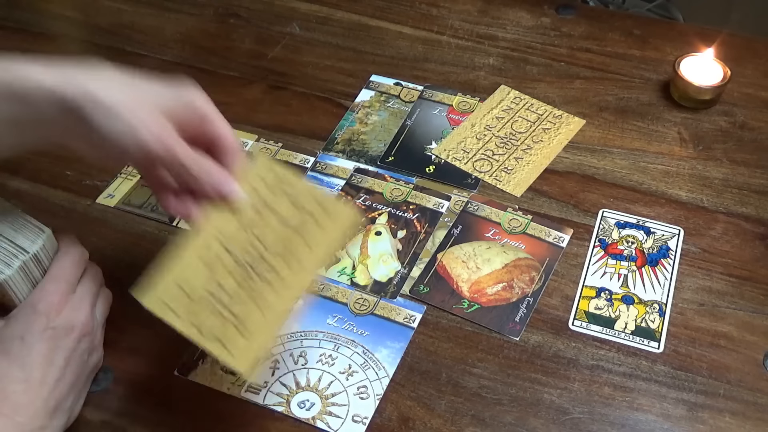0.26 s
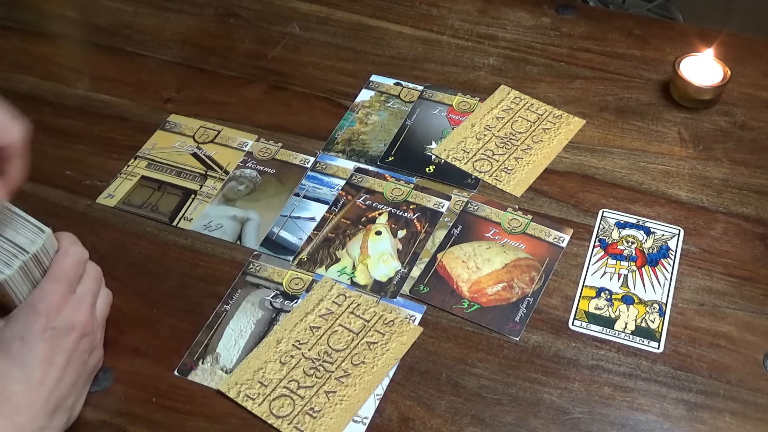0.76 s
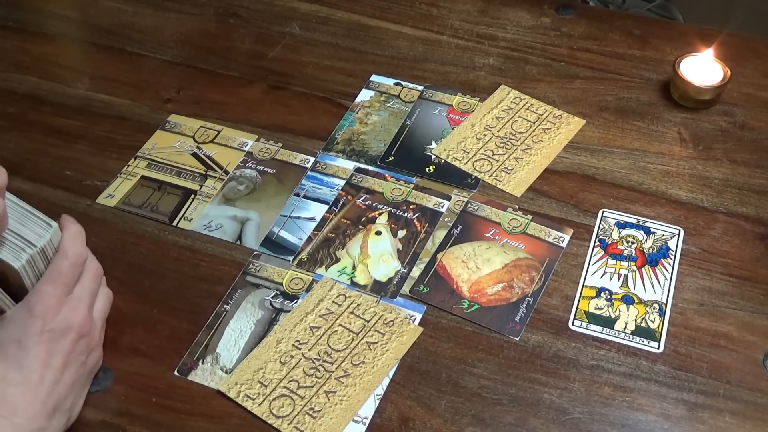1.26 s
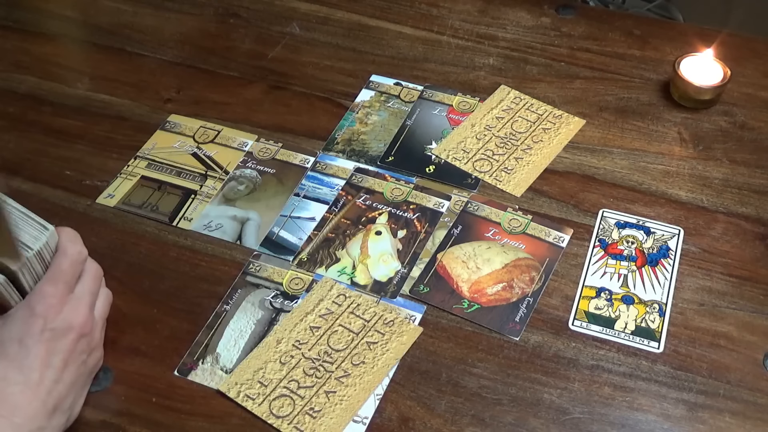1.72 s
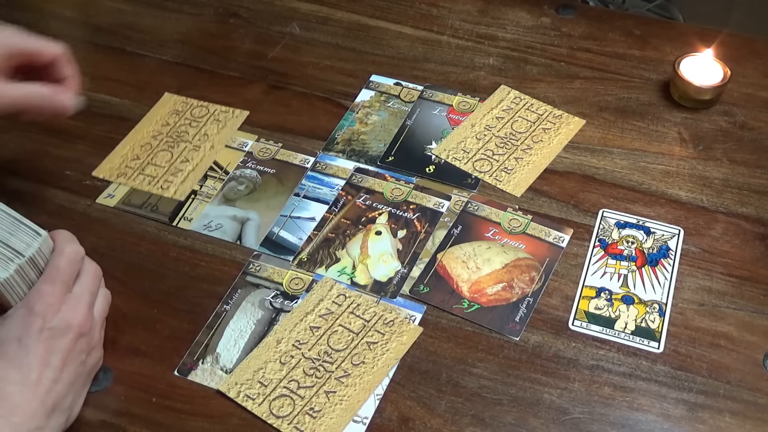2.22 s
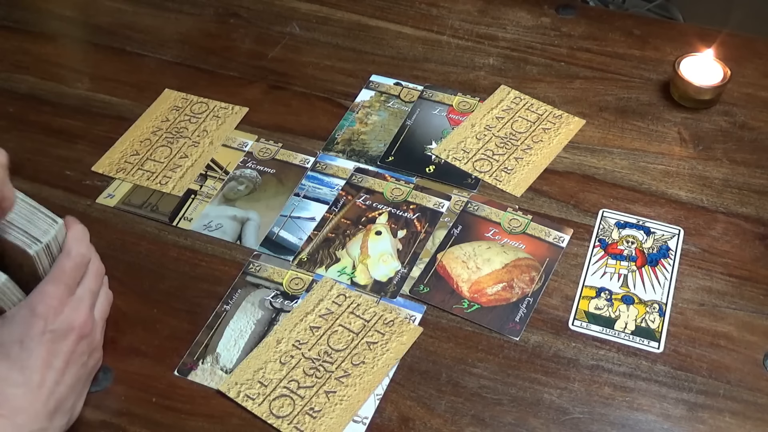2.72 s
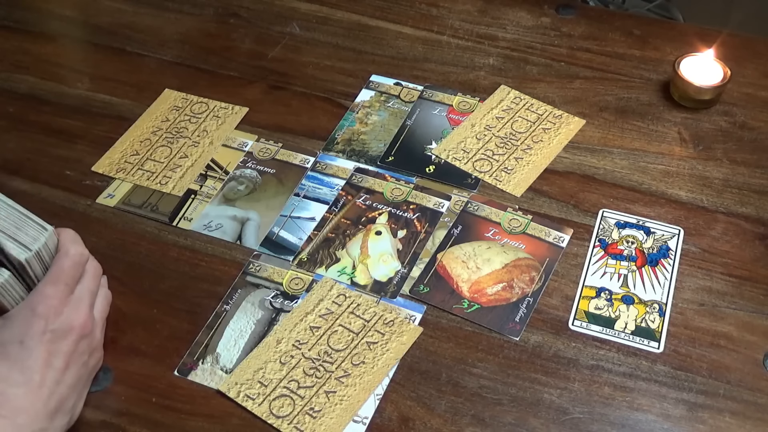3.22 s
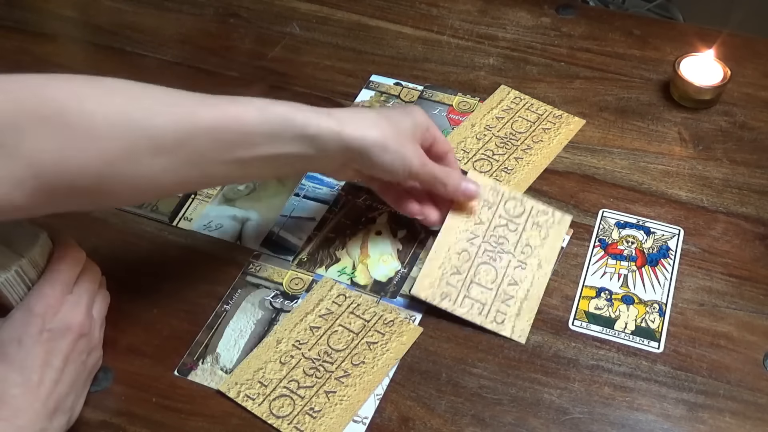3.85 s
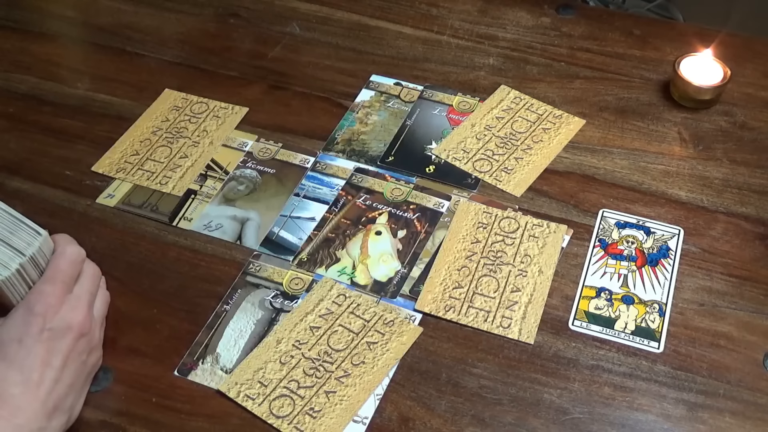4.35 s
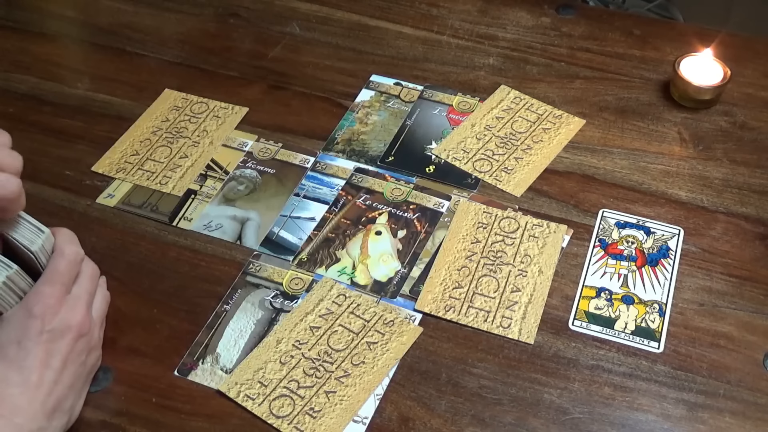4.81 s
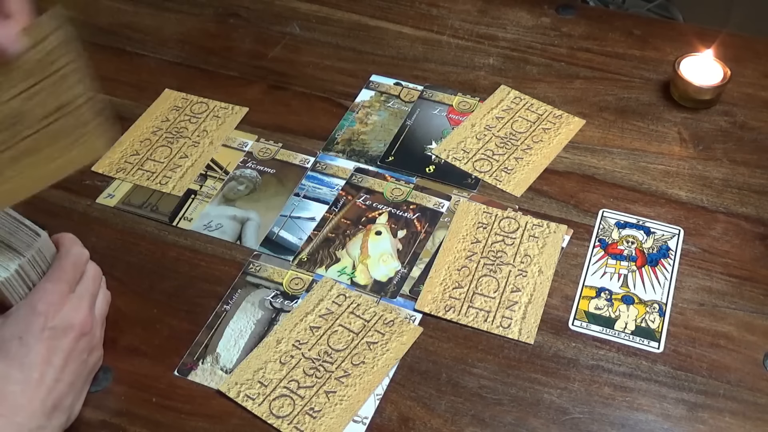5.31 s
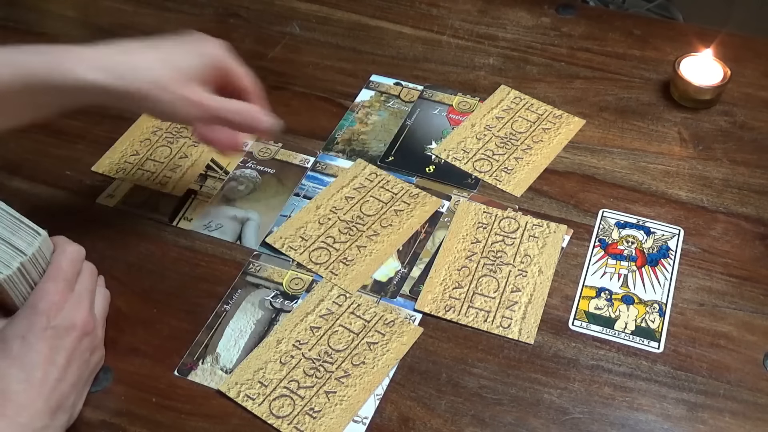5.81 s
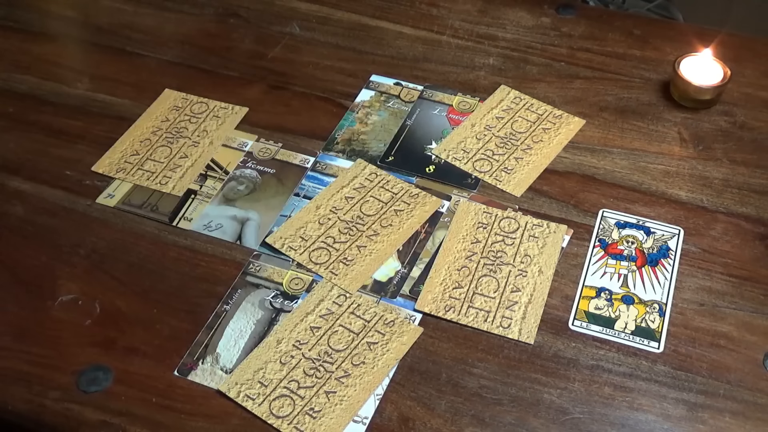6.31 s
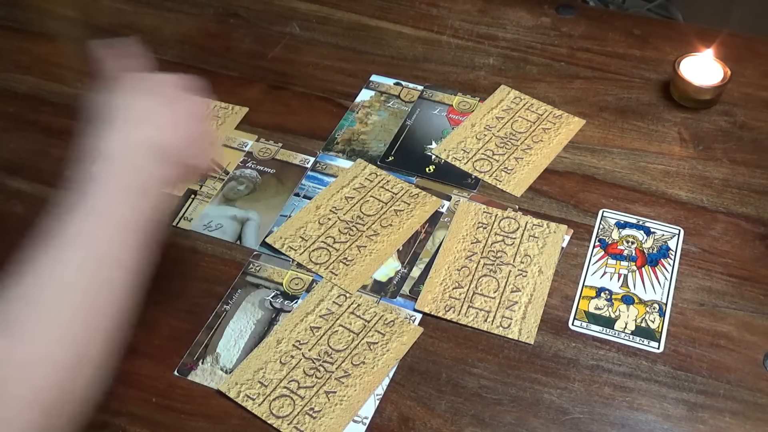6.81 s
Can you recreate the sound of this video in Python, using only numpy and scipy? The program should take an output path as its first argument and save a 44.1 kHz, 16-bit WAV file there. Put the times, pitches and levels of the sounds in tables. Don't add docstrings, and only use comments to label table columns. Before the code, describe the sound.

Close stereo pickup in a small quiet room with faint mains hum, rumble and hiss. Stiff cards are drawn from a held deck with dry rasps, snap at the edges and land on a wooden table with light knocks. Uneven pauses separate them. Near the end, the whole deck is slapped down, a bright crack with a woody thump far louder than the rest.

```python
import sys
import numpy as np
from scipy import signal
from scipy.fft import rfft, irfft, next_fast_len
from scipy.io import wavfile

SR = 44100
rng = np.random.default_rng(int(sys.argv[2]) if len(sys.argv) > 2 else 0)


def invert_db(x):
    u = np.asarray(x, float) / 20
    return 10 ** u


def file_out(sig):
    cols = np.atleast_2d(sig).T
    lim = np.clip(cols, -1, 1)
    pcm = np.round(lim * 32767).astype(np.int16)
    wavfile.write(sys.argv[1], SR, pcm)


N = 311390
SIDES = np.array([[1], [-1]])


def rms_one(x):
    return x / np.sqrt(np.mean(x ** 2) + 1e-20)


def at_hz(points, hz):
    point_hz, value = np.transpose(points)
    return np.interp(np.log(hz), np.log(point_hz), value)


def drift(rate_hz):
    r = np.exp(-40 * np.pi * rate_hz / SR)
    slow = signal.lfilter([1], [1, -2 * r, r * r], rng.standard_normal(N // 20 + 2002))[2000:]
    return np.interp(np.arange(N) / 20, np.arange(len(slow)), rms_one(slow))


def resonate(x, hz, width_hz):
    r = np.exp(-np.pi * width_hz / SR)
    zeros = np.array([1, 0, -1]) * (1 - r * r) / 2
    poles = [1, -2 * r * np.cos(2 * np.pi * hz / SR), r * r]
    return signal.lfilter(zeros, poles, x)


def butter_filter(x, order, hz, kind):
    return signal.sosfilt(signal.butter(order, hz, kind, fs=SR, output="sos"), x)


def add(out, s, piece):
    i = round(s * SR)
    out[..., i:i + piece.shape[-1]] += piece[..., :N - i]


def room_tone():
    # centre_hz, density_db (per Hz)
    tone_curve = [(35, -23), (62, 10), (110, 10), (250, 5.5), (500, -2), (1000, -8), (1300, -6.5),
                  (1700, -12.5), (2500, -12.5), (3700, -12), (5000, -13.5), (7000, -15.5), (11000, -15),
                  (16000, -17.5)]
    # centre_hz, likeness (-1 to 1)
    likeness = [(60, -0.69), (110, -0.57), (200, -0.15), (380, -0.1), (700, 0.0), (1290, 0.27),
                (2380, 0.25), (4400, 0.15), (6500, 0.15), (7200, 1), (15000, 0.95)]
    # multiple, left_db, right_db
    hum_partials = [(1, -51.5, -61), (2, -73, -69), (3, -57, -67), (5, -65.5, -76.5), (7, -70.5, -71.5),
                    (9, -75, -94)]
    mains_hz, level_db = 49.993, -54
    noise, edges_hz = 0, 32 * 2 ** np.arange(0, 9.2, 1 / 3)
    white = rng.standard_normal((2, 2, N))
    for k, (low, high) in enumerate(zip(edges_hz, edges_hz[1:])):
        mid, side = butter_filter(white[k % 2], 2, [low, high], "band")
        centre_hz = np.sqrt(low * high)
        alike = np.clip(at_hz(likeness, centre_hz), -1, 1)
        wander_db = (0.5 + 12.0 / np.sqrt(low)) * drift(1.1)
        gain = invert_db(at_hz(tone_curve, centre_hz) + wander_db)
        noise = noise + gain * (np.sqrt(1 + alike) * mid + np.sqrt(1 - alike) * side * SIDES)
    phase = 2 * np.pi * mains_hz * np.arange(N) / SR
    hum = sum(np.sqrt(2) * invert_db([[left], [right]]) * np.cos(k * phase - 1) for k, left, right in hum_partials)
    return invert_db(level_db) * noise / np.std(noise.mean(axis=0)) + hum


def room_echo(x):
    t60_s, wall_cut_hz = 0.44, 3800
    size = next_fast_len(N + SR)
    w = 2 * np.pi * np.arange(size // 2 + 1) / size
    dull = 1 / (1 + 1j * w * SR / (2 * np.pi * wall_cut_hz))
    lags = rng.uniform(0.008, 0.035, (2, 8, 1)) * SR
    loops = invert_db(-60 * lags / SR / t60_s) * dull * np.exp(-1j * w * lags)
    echoes = np.sum(loops / (1 - loops), axis=1)
    return irfft(rfft(x, size) * echoes, size)[:, :N]


def table_thuds():
    # start_s, peak_db
    pushes = [(0.129, -34), (.553, -44), (2.209, -48), (2.231, -34.5), (3.182, -58), (3.436, -42.5),
              (4.0398, -42.5), (4.531, -45.5), (4.632, -52), (5.333, -39), (5.368, -36.5), (5.417, -39.5),
              (5.428, -40.5), (5.799, -42.5), (6.04, -35.5), (6.594, -47), (6.715, -37), (6.72, -12.5),
              (6.7526, -26.5)]
    # pitch_hz, level_db, t60_s
    wood_modes = [(86, -11, 0.53), (112.5, -10.5, 0.77), (125, -1.5, 0.46), (160.2, -7.5, 1),
                  (179.3, -9.5, 0.87), (208.5, 6, 0.1), (276, -10.5, 0.29), (322, -12.5, 0.24),
                  (380, -18, 0.16), (444, -15.5, .15), (533, -9, 0.2), (595, 1, 0.26), (613, -17, 0.5),
                  (756, -17, .15)]
    out, t = np.zeros((2, N)), np.arange(18000) / SR
    push = np.sin(np.pi * np.clip(t / 0.0018, 0, 1)) ** 2
    jolt = resonate(push, 250, 154)
    jolt = jolt / np.abs(jolt).max()
    rings = []
    for hz, level_db, t60_s in wood_modes:
        fading = invert_db(level_db - 60 * t / (0.67 * min(t60_s, 0.7)))
        rings.append(fading * np.cos(2 * np.pi * hz * t))
    rings = signal.fftconvolve(rings, push[None, :400] / push.sum(), axes=1)[:, :len(t)]
    for (s, db), chance in zip(pushes, rng.standard_normal((len(pushes), 2, len(wood_modes)))):
        strength = invert_db(1.5 * chance[0] + 1.5 * chance[1] * SIDES)
        add(out, s, invert_db(db) * (jolt + 0.28 * strength @ rings))
    return out


def finger_drags():
    # start_s, length_s, rms_db, centre_hz, width_hz
    drag_list = [(.125, 0.063, -46, 380, 129.6), (.19, .07, -59, 1320, 400), (.438, .095, -57.5, 497, 400),
                 (0.547, .032, -48, 397, 200), (1.049, .17, -62.5, 1200, 300),
                 (2.516, 0.065, -56.5, 450, 400), (2.857, 0.078, -58, 1250, 300),
                 (3.174, 0.028, -49, 365, 150), (4.512, 0.065, -56.5, 374, 200),
                 (5.136, .045, -49, 1940, 150), (5.359, 0.028, -45, 380, 200), (5.79, 0.037, -50, 350, 150),
                 (5.954, .05, -51, 380, 150), (6.025, .04, -39.5, 290, 200), (6.43, 0.11, -56, 560, 250),
                 (6.569, 0.054, -45, 473, 200)]
    out = np.zeros(N)
    for (s, length_s, db, hz, width_hz), noise in zip(drag_list, rng.standard_normal((len(drag_list), 12000))):
        rub = rms_one(resonate(resonate(noise, hz, width_hz), hz, 2 * width_hz))
        swell = np.sqrt(np.hanning(round(length_s * SR)))
        add(out, s, invert_db(db) * rub[:len(swell)] * swell)
    return out


def blows(rows, damping):
    out, t = np.zeros(N), np.arange(2200) / SR
    for (s, db, hz), noise in zip(rows, rng.standard_normal((len(rows), 2200))):
        blow = (t == 0) + 0.13 * noise * np.exp(-t * hz / 4.74)
        blow = signal.lfilter([1], [1, -np.exp(-2 * np.pi * 0.67 * hz / SR)], blow)
        ring = resonate(blow, hz, damping * hz) + 0.59 * resonate(blow, 1.1 * hz, 3.0 * hz)
        add(out, s + 0.00024, invert_db(db - 2.5) * ring / np.abs(ring).max())
    return out


def finger_knocks():
    # start_s, peak_db, centre_hz
    knock_list = [(0.076, -38, 1650), (0.13, -22.5, 850), (0.137, -26, 585), (0.61, -38, 694),
                  (1.704, -37, 401), (1.799, -30, 615), (1.846, -22.5, 810), (1.88, -31, 533),
                  (2.208, -31.5, 1250), (2.214, -32.5, 536), (2.232, -27, 533), (3.319, -28, 1880),
                  (3.336, -36, 595), (3.414, -37, 719), (3.436, -28, 470), (3.443, -24.5, 846),
                  (3.479, -33, 413), (3.622, -38.5, 633), (4.6345, -34, 372), (4.8, -36.5, 437),
                  (5.33, -31.5, 397), (5.344, -31, 820), (5.3675, -27.5, 930), (5.414, -34.5, 1020),
                  (5.798, -36, 760), (5.824, -34, 710), (6.04, -23.5, 816), (6.094, -29.5, 820),
                  (6.448, -34, 650), (6.6135, -31, 380)]
    # start_s, peak_db, centre_hz
    bump_list = [(.1328, -16.5, 1500), (.145, -29, 420), (.161, -32, 900), (.18, -36, 600),
                 (1.911, -35, 500), (3.4395, -24, 900), (3.449, -31, 1000), (4.0407, -16, 2100),
                 (5.3318, -25, 2200), (5.347, -31, 1500), (6.048, -29, 700), (6.427, -40, 700),
                 (6.499, -39, 700), (6.541, -36, 600), (6.7245, -14, 200)]
    return blows(knock_list, damping=0.18) + blows(bump_list, damping=0.55)


def edge_ticks():
    # start_s, peak_db, centre_hz
    tap_list = [(0.047, -36, 3540), (0.1281, -24, 2510), (0.1327, -24, 2220), (0.2867, -41, 3040),
                (0.611, -34, 2400), (1.2437, -40, 3570), (1.5853, -35, 2090), (1.7987, -35, 1300),
                (1.846, -32, 1400), (5.367, -37, 1500), (1.884, -27, 3490), (2.2079, -38, 2110),
                (2.2321, -32.5, 2000), (3.6241, -27.5, 2800), (4.0405, -27, 3200), (4.0426, -25, 1300),
                (4.045, -31, 2400), (4.634, -33, 2000), (5.3315, -28, 3980), (5.463, -34, 3730),
                (5.7911, -31, 3800), (6.0206, -31, 3900), (6.0917, -31.5, 2520), (6.4265, -35, 2870),
                (6.447, -37, 3450), (6.4985, -30.5, 3200), (6.54, -27, 3200), (6.5964, -35, 3720)]
    # start_s, peak_db, centre_hz
    snap_list = [(0.0275, -27, 13500), (0.1544, -33, 11000), (2.232, -29, 7500), (5.548, -27.5, 7000),
                 (0.4244, -38, 5920), (0.65, -38, 5700), (.662, -41, 5000), (1.0084, -37, 8620),
                 (1.5189, -27.5, 12400), (3.0786, -31, 6100), (3.0992, -35, 6440), (3.1338, -38, 13200),
                 (3.1557, -22, 12000), (3.1588, -24, 11500), (3.318, -18.5, 9500), (3.4383, -20, 12200),
                 (3.454, -24, 11200), (3.692, -40, 10000), (4.6848, -35, 9880), (4.8888, -36, 6350),
                 (5.065, -33, 12000), (5.4152, -27, 6500), (5.8087, -37, 7640), (5.8249, -24, 5040),
                 (5.9394, -31.5, 11300), (6.0615, -25, 13500), (6.127, -34, 10700), (6.5256, -28, 5130)]
    # start_s, peak_db, centre_hz
    extra_catches = [(1.706, -35, 9000), (3.125, -41, 2500), (3.339, -36, 2200), (3.346, -38, 1500),
                     (3.38, -26, 9200), (3.4, -29, 9000), (4.772, -38, 13000), (5.026, -38, 8000),
                     (5.061, -34, 13000), (5.164, -32, 12000), (5.491, -38, 2800), (6.031, -30, 3800),
                     (6.532, -34, 5000), (6.5405, -31, 6000)]
    crack_ms = 0.42
    catches = tap_list + snap_list + extra_catches
    out, t = np.zeros((2, N)), np.arange(900) / SR
    for (s, db, hz), noise in zip(catches, rng.standard_normal((len(catches), 2, 900))):
        noise = noise + 2.6 * (t == 0)
        fading = np.exp(-t * 1000 / crack_ms) + 0.13 * np.exp(-t / 0.005)
        crack = (noise[0] + 0.35 * noise[1] * SIDES) * fading
        crack = resonate(crack, hz, 0.56 * hz) + 0.2 * hz / 9000 * np.diff(crack, prepend=0)
        crack = butter_filter(crack, 2, 0.39 * hz, "high")
        add(out, s + 0.0006, invert_db(db + 1.6) * crack / np.abs(crack).max())
    return out


def scuffs():
    # start_s, length_s, rms_db, centre_hz, width_hz
    scuff_list = [(.052, .047, -44.5, 3700, 500), (.075, .022, -49, 1700, 600),
                  (.145, .045, -48, 1200, 700), (.11, .02, -49, 1000, 800), (1.58, .125, -53, 2100, 700),
                  (1.6, .11, -51, 6900, 2000), (1.65, .058, -49, 3400, 900), (1.81, .05, -48, 5800, 1500),
                  (1.82, .045, -48, 3600, 700), (1.81, .05, -49, 12500, 2000), (1.88, .04, -50, 1500, 800),
                  (3.32, .04, -49, 8500, 1500), (3.367, .052, -42.5, 9000, 1300),
                  (3.38, .04, -46, 13500, 2500), (3.435, .025, -41, 12500, 2000),
                  (3.485, .025, -50, 10000, 4000), (4.79, .025, -52, 6200, 1500),
                  (5.07, .06, -53, 6200, 1000), (5.14, .045, -48, 8500, 2000), (5.13, .06, -50, 3000, 1200),
                  (5.3, .035, -51, 7000, 2500), (5.33, .03, -49, 1800, 600), (5.34, .02, -49, 3800, 800),
                  (5.368, .02, -50, 1700, 600), (5.537, .03, -51, 6200, 1500),
                  (6.02, .013, -41, 6200, 1200), (6.005, .03, -46, 3900, 800),
                  (6.088, .012, -45, 4500, 3000), (6.108, .012, -46, 4000, 2000),
                  (6.06, .007, -45, 5500, 1000), (6.655, .05, -37, 3500, 600), (6.66, .04, -45, 5000, 900),
                  (6.635, .06, -49, 7200, 1500), (6.709, .01, -27, 3500, 1000), (6.73, .12, -49, 4000, 900)]
    out = np.zeros((2, N))
    for (s, length_s, db, hz, width_hz), noise in zip(scuff_list, rng.laplace(size=(len(scuff_list), 2, 7000))):
        clicks = noise * np.abs(noise)
        mid, side = resonate(resonate(clicks, hz, width_hz), hz, 2 * width_hz)
        swell = signal.windows.tukey(round(length_s * SR), 0.6)
        rub = (mid + 0.6 * hz / 10000 * side * SIDES) / np.std(mid)
        add(out, s, invert_db(db) * rub[:, :len(swell)] * swell)
    return out


def grains(per_s, spread_db, modes, width, patchy_db, size=N):
    sizes = invert_db(spread_db * np.minimum(rng.exponential(1, (2, size)), 4)) * rng.choice([-1, 1], (2, size))
    clicks = sizes * (rng.random((2, size)) < per_s / SR)
    rung = np.zeros((2, size))
    for k, (hz, width_hz, db) in enumerate(modes):
        patches = invert_db(db + patchy_db * drift(10)[:size])
        rung += (-1) ** k * patches * resonate(clicks, hz, width_hz)
    mid, side = rung
    return (mid + width * side * SIDES) / np.std(mid)


def deck_slap():
    # time_s, level_db
    rush = [
        (6.65, -49),
        (6.695, -30),
        (6.6991, -15),
        (6.7023, -12),
        (6.7049, -5),
        (6.7065, -15.5),
        (6.71, -24),
        (6.732, -39),
        (6.86, -61),
    ]
    # centre_hz, width_hz, level_db
    slap_modes = [(1820, 730, -8), (2860, 490, -5), (3700, 600, -2), (5170, 650, 1), (5920, 400, 4),
                  (7770, 600, -7.5), (10700, 500, -7)]
    s, db = np.transpose(rush)
    out, t = np.zeros((2, N)), np.arange(s[0], s[-1], 1 / SR)
    edges = grains(30000, 0.74, slap_modes, width=0.089, patchy_db=0.8, size=len(t))
    edges[1] = np.roll(edges[1], shift=1)
    edges = butter_filter(edges, 2, [900, 8500], "band")
    add(out, s[0], invert_db(np.interp(t, s, db)) * edges)
    return out


def strokes(rows, attack_s=0, release_s=0, held=False):
    out = np.zeros((3, N))
    swing_db = np.array([[18.5], [24.5], [18]])
    for s, length_s, rasp_db, body_db, hiss_db in rows:
        corners_s = np.cumsum([0, attack_s or length_s, held * length_s, release_s or length_s])
        speed = np.interp(np.arange(0, corners_s[-1], 1 / SR), corners_s, [0, 1, 1, 0])
        full_db = rasp_db + np.array([[body_db], [0], [hiss_db]])
        power = invert_db(full_db + swing_db * (speed - 1)) ** 2
        add(out, s - attack_s, power * np.minimum(10 * speed, 1))
    return out


def card_slides():
    # start_s, length_s, rasp_db, body_db (above rasp), hiss_db (above rasp)
    pull_list = [(6.9, .15, -60.5, 2, -2), (1.56, 0.14, -48, -4, -2), (3.455, 0.042, -53, -0.5, 8.5),
                 (1.76, 0.043, -48.5, 0, 1), (5.19, 0.132, -56.5, 0, 12.5), (4.7, 0.1, -48.5, -3, -2.5),
                 (5.03, 0.15, -45, -4, 1.5), (5.29, 0.054, -51, 3, 0), (1.49, .08, -64.5, 7, 12),
                 (5.93, 0.096, -43.5, -2, -2.5), (6.05, 0.06, -47.5, 3.5, 4.5), (6.56, 0.15, -41, -12, -4)]
    rub_list = [(4.82, 0.075, -61.5, -2, 5.5), (.055, .03, -46, 0, 2), (.1, 0.032, -57, 9.5, 7),
                (1.59, 0.078, -52, -4, 4), (1.72, 0.057, -66.5, 6, 12), (1.815, .04, -44, -3, 4),
                (5.545, .018, -48, -3.5, 0), (.39, 0.19, -63.5, -1.5, -3), (1.23, 0.15, -56.5, -4, -0.5),
                (1.865, 0.045, -50, -1, 1.5), (2.75, .18, -62.5, -4.5, 6.5), (3.08, 0.068, -65, 3.5, 8),
                (3.18, .125, -57, -4, 7), (3.32, 0.054, -59.5, -1, 14), (3.378, 0.034, -53, -3, 11),
                (3.435, .02, -51, 0, 12.5), (3.76, 0.23, -58.5, -5.5, -4.5), (4.16, 0.24, -63, -7, -5),
                (4.68, 0.05, -72, -5, 19), (5.07, 0.086, -53, -5, -1), (5.62, 0.18, -65.5, -2, 1),
                (6.02, 0.045, -48.5, -2, -4), (6.18, .17, -60.5, -8, -5.5), (6.37, 0.28, -61, 2, 2)]
    skid_list = [(.008, 0.13, -54, 3, 8), (.136, 0.09, -52, 11, 2), (.6, .13, -66, -3, 7),
                 (2.236, 0.032, -55, 5, 2.5), (4.048, 0.066, -61, 9, -8), (5.828, 0.038, -54.5, 1, 3),
                 (4.53, .05, -60, 0, 5), (4.81, .06, -52, -5, -1), (4.978, 0.05, -54.5, -1, 1),
                 (5.35, 0.12, -50, -2, 2), (6.74, 0.22, -48, -1, -2)]
    # centre_hz, width_hz, level_db
    body_modes = [(773, 630, 1), (1400, 410, 1.5), (1800, 450, 1.5)]
    rasp_modes = [(2480, 1160, -10), (3270, 540, -4), (3750, 350, -1.5), (5170, 3400, -12.5)]
    hiss_modes = [(6120, 750, -2), (8520, 1650, -1.5), (10090, 860, 0.5), (11200, 1200, -0.5),
                  (13300, 2300, 1), (14960, 3000, -5)]
    power = strokes(pull_list, release_s=0.032) + strokes(skid_list, attack_s=0.007)
    power = power + strokes(rub_list, attack_s=0.024, release_s=0.02, held=True)
    body_level, rasp_level, hiss_level = np.sqrt(power)
    slip = drift(54)
    body = body_level * invert_db(1.1 * slip + 1.5 * drift(26))
    body = body * grains(2500, 4.1, body_modes, width=0.23, patchy_db=1.0)
    rasp = rasp_level * invert_db(0.79 * slip + 0.85 * drift(36))
    rasp = rasp * grains(6000, 3.0, rasp_modes, width=0.28, patchy_db=1.5)
    hiss = hiss_level * invert_db(1.6 * slip + 0.89 * drift(20))
    hiss = hiss * grains(12000, 3.5, hiss_modes, width=0.45, patchy_db=1.2)
    return body + rasp + hiss


def scene():
    fingers = finger_drags() + finger_knocks()
    cards = edge_ticks() + scuffs() + deck_slap() + card_slides()
    hands = (table_thuds() + fingers + cards) * invert_db(0.7 * SIDES)
    return room_tone() + invert_db(-20.5) * room_echo(hands.mean(axis=0)) + hands


def band_limit(x):
    return signal.sosfilt(signal.butter(12, 16460, fs=SR, output="sos"), x)


def record(dry):
    low_pass = signal.ellip(8, 0.5, 40, 15850, fs=SR, output="sos")
    cut = signal.sosfilt(low_pass, dry)
    cut = butter_filter(cut, 2, 35, "high")
    return band_limit(np.clip(cut, -1, 1))


dry = scene()
out = record(dry)
file_out(out)
```